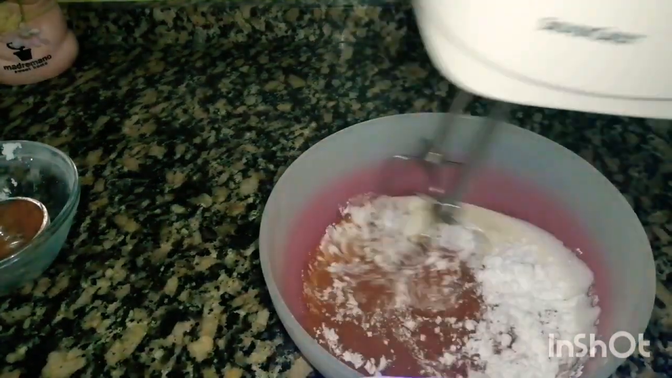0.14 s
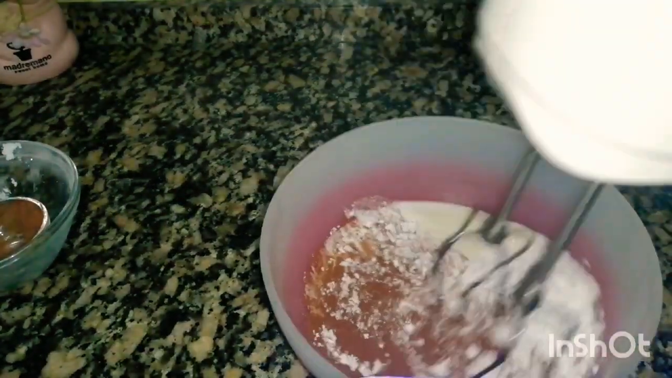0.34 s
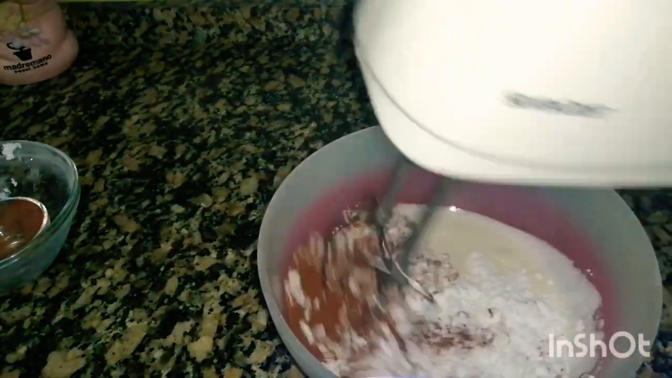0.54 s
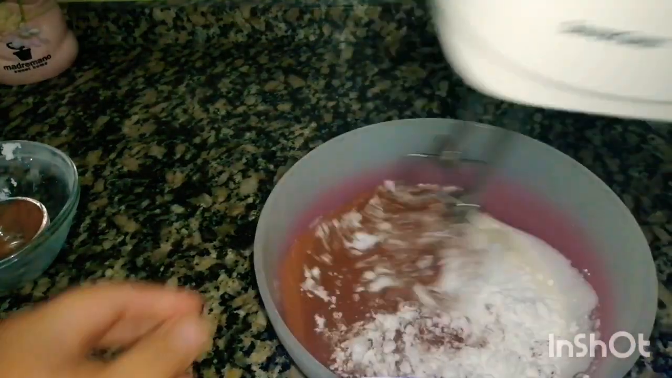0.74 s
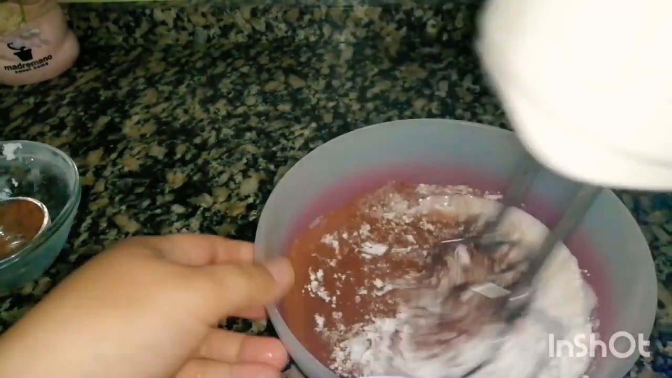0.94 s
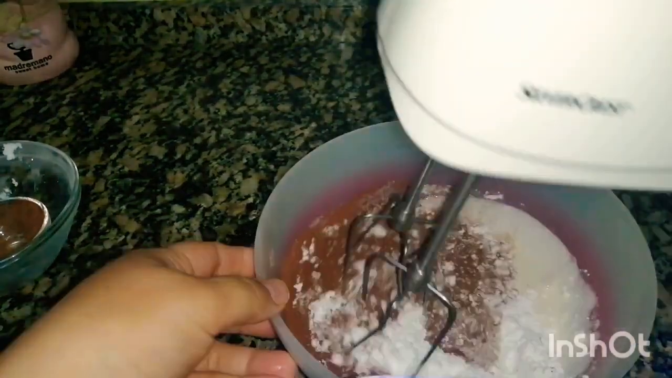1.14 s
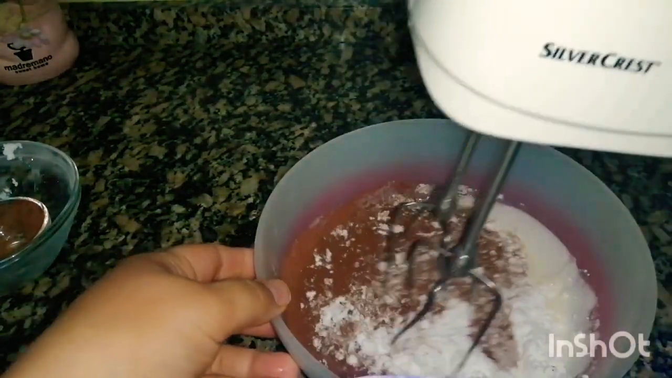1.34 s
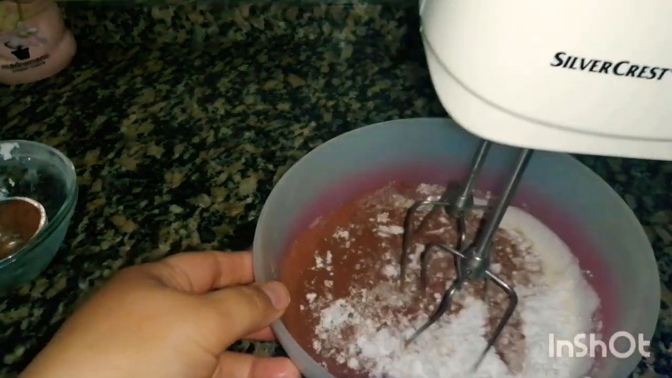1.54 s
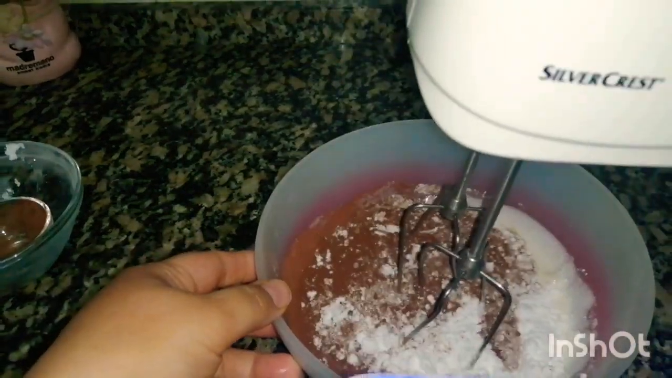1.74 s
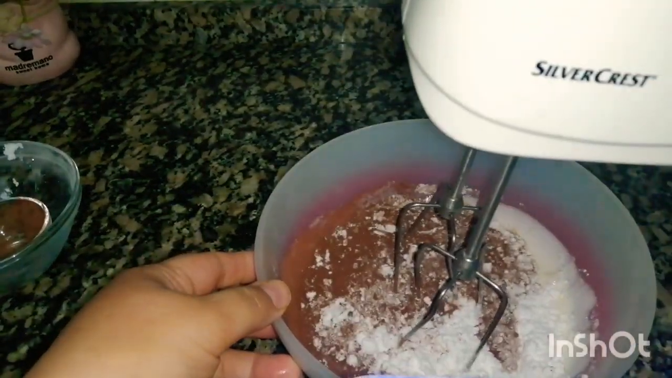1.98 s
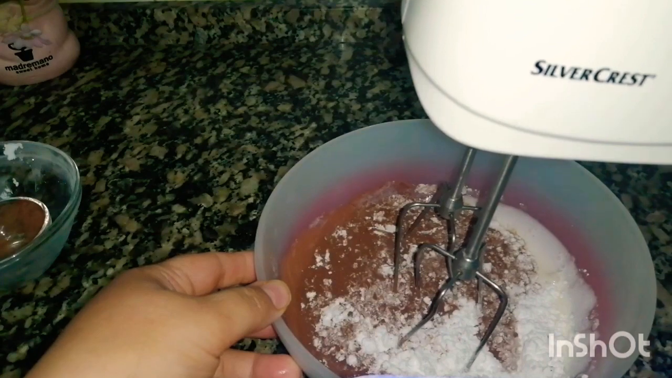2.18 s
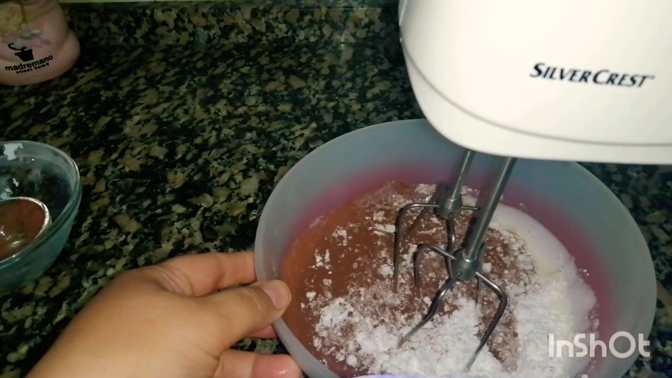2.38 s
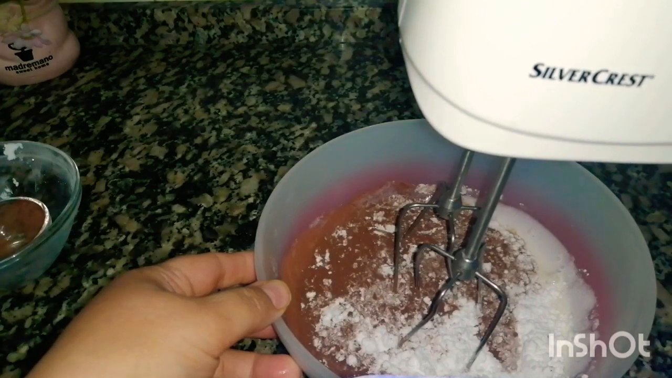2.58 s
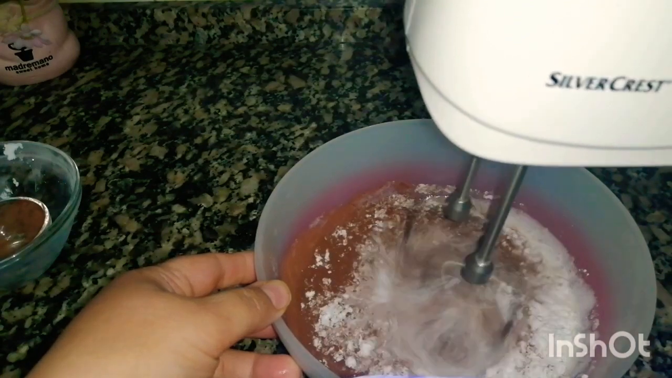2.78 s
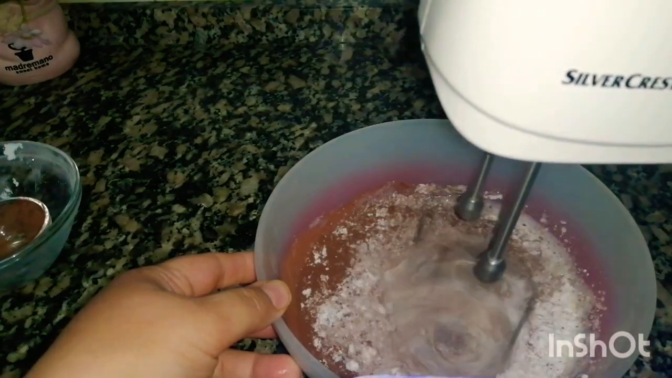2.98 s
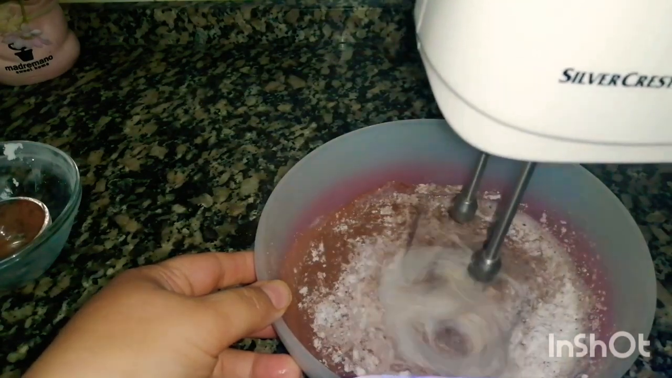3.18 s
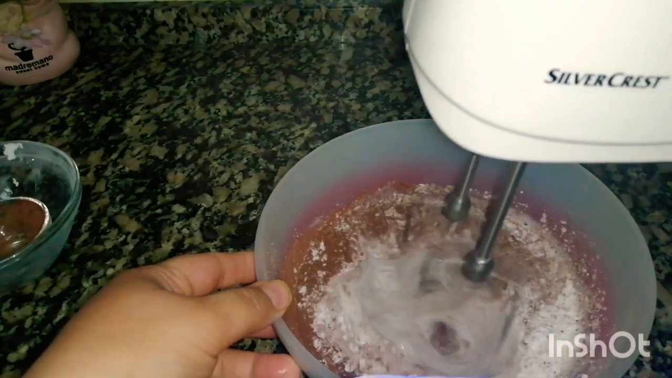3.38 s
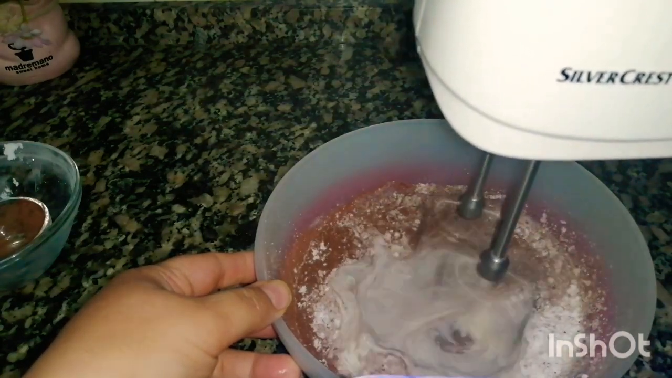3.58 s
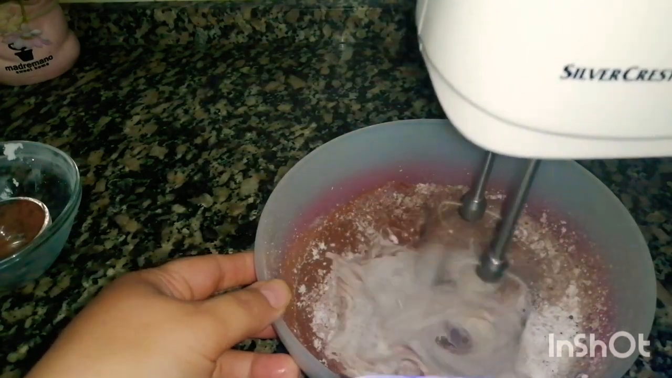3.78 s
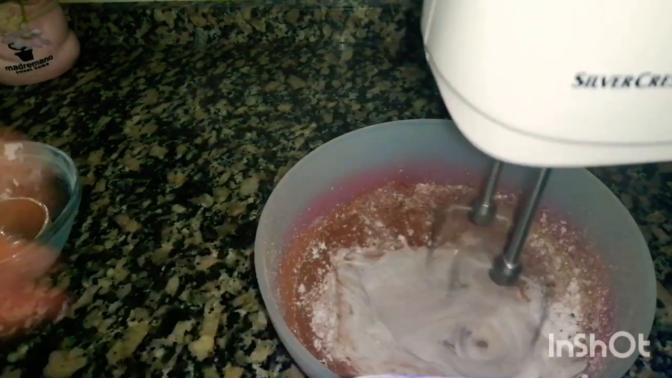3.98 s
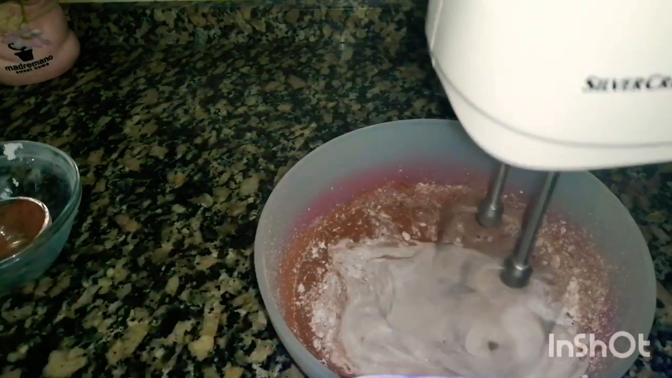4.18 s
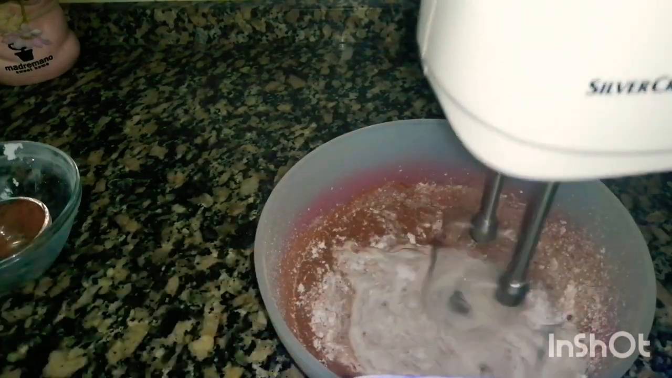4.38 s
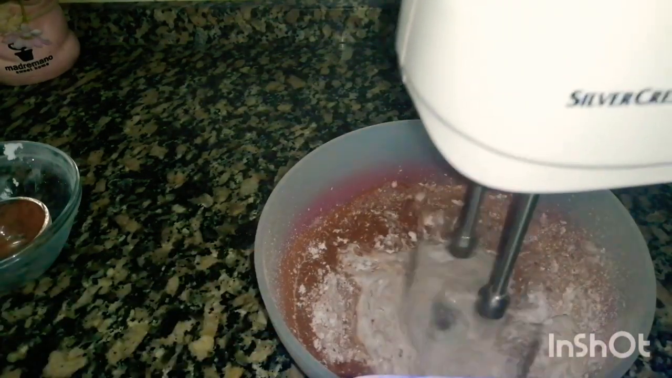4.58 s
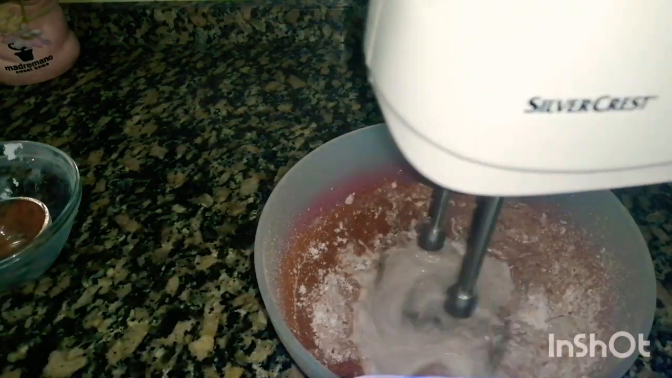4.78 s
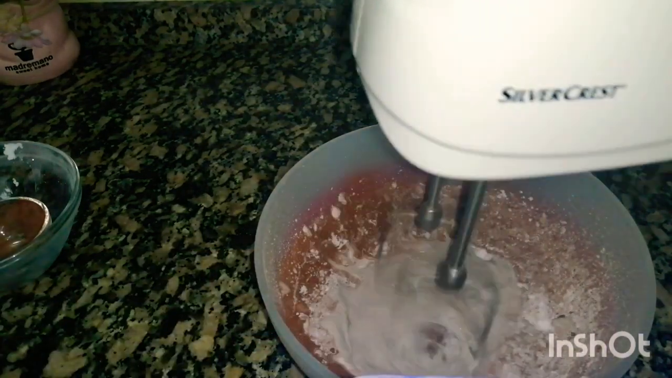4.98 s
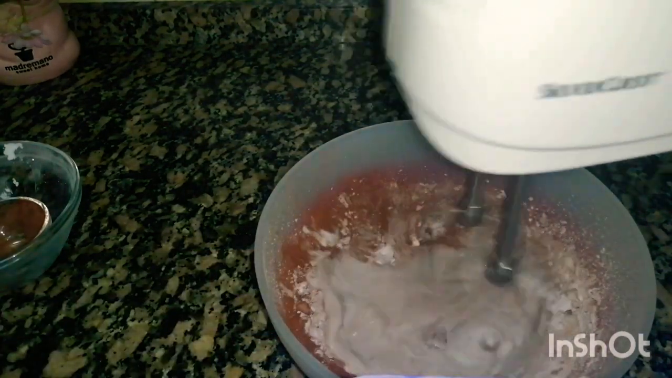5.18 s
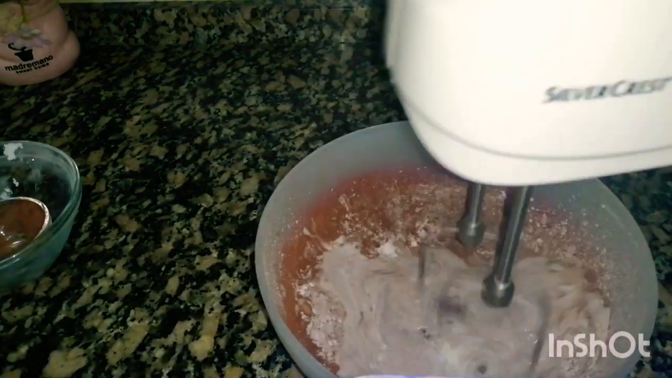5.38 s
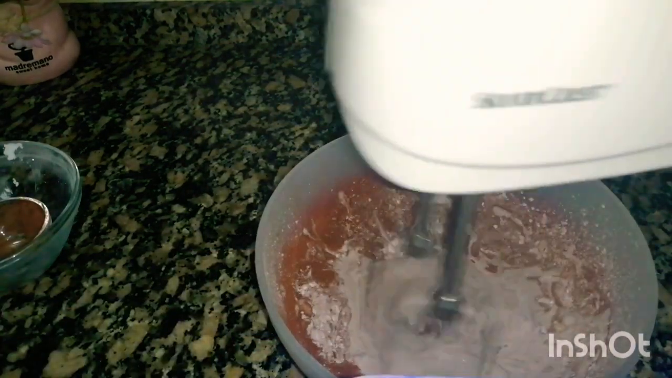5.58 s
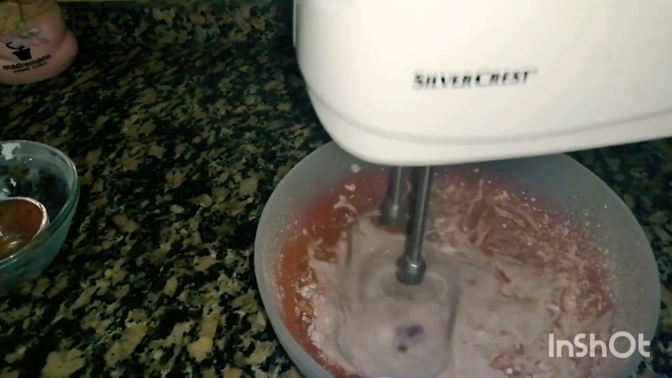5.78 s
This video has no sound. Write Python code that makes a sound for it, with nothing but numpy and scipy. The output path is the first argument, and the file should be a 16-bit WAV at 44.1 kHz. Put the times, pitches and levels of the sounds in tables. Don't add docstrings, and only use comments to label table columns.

```python
import sys
import numpy as np
from scipy import signal
from scipy.fft import rfft, irfft
from scipy.io import wavfile

SR = 44100
rng = np.random.default_rng(int(sys.argv[2]) if len(sys.argv) > 2 else 0)


def unload_wav(signal):
    wavfile.write(
        sys.argv[1],
        SR,
        np.round(np.clip(np.atleast_2d(signal).T, -1, 1) * 32767).astype(np.int16),
    )


def undo_db(level):
    steps = np.asarray(level, float) / 20
    return 10 ** steps


N = 257103
TIME = np.arange(N) / SR
SWITCH_ON_S = 2.7
LOAD_FROM_S, LOAD_FULL_S = 3.7, 4.57
RUSH_TOP_DB = -32
SLOTS = 12

# (time [s], speed [turns/s])
SHAFT_SPEED = [(2.72, 59.6), (2.8, 117.5), (2.88, 165.1), (2.93, 189.8), (3.0, 215.2), (3.08, 237.2),
               (3.17, 255.7), (3.27, 270.7), (3.4, 286.6), (3.55, 298.3), (3.85, 320.5), (4.0, 328.5),
               (4.4, 350.2), (4.6, 358.1), (5.0, 366.3), (5.2, 368.0), (5.4, 366.8), (5.82, 367.5)]
# (frequency [Hz], width [Hz], level [dB])
HOUSING_MODES = [(305, 24, -1), (462, 55, -4), (564, 20, 6)]
# (frequency [Hz], width [Hz], level on top [dB])
MOUNT_MODES = [(274.4, 20, -32.5), (305.2, 12.7, -21.5), (323.9, 4.9, -30), (346.4, 10.6, -39),
               (367.7, 31, -33)]
# (frequency [Hz], width [Hz], level on top [dB])
SHELL_MODES = [(440, 60, -27), (512, 60, -19), (574, 26, -24)]
# (frequency [Hz], width [Hz], level on top [dB])
STATOR_MODES = [(1474, 120, 5.7), (2710, 290, 5.2), (3000, 590, 2.6)]
# (frequency [Hz], width [Hz], level on top [dB])
BRUSH_MODES = [(4700, 250, -4), (5650, 400, 5), (6450, 400, 4)]
# (mains beats off the tone [count], level [dB])
MAINS_SIDE_TONES = [(-1, -5), (0, 0), (1, -7), (2, -8)]
# (multiple of the shaft speed [count], level [dB])
COMMUTATOR_TONES = [(24, -29), (36, -37), (48, -26), (60, -40), (72, -27)]
# (multiple of the shaft speed [count], free level [dB], loaded level [dB], roughness [rad])
GEAR_TONES = [(3, -31, -25, .45), (4, -31, -31, .9), (5, -40, -25, 1.4), (6, -40, -32, 1.2),
              (8, -44, -30, 1.3), (9, -44, -28, .7)]
# (time [s], level [dB])
SWITCH_SPARKS = [
    (2.71, -39.5),
    (2.746, -29),
]
# (time [s], drone level [dB], slop level [dB])
BOWL_GRAZES = [(2.94, -30, -56), (3.08, -24, -58), (3.34, -25.5, -44.5), (3.8, -26, -42.5),
               (3.96, -36, -38), (4.138, -23.5, -50), (4.22, -26, -34.5), (4.34, -25, -42),
               (5.4, -27.5, -35), (5.67, -31.5, -57), (5.8, -34, -36)]
# (time [s], scrape level [dB], drag length [s], bowl rub level [dB], dry crunch level [dB])
WIRE_LANDINGS = [
    (0.198, -49.5, 0.14, -43.5, -71.5),
    (0.46, -57, 0.017, -47, -80),
    (0.64, -50, .18, -75, -60),
    (0.845, -51, 0.022, -56, -66),
    (1.059, -48.5, 0.057, -59, -64),
    (1.262, -47.5, 0.029, -45, -85),
    (1.589, -71, .02, -67, -81),
    (1.98, -78, 0.082, -74, -86),
]
# (time of the top [s], scrape level [dB], bowl rub level [dB], dry crunch level [dB])
WIRE_SWEEPS = [(0.0, -70.5, -57, -100), (0.05, -91, -66, -100), (0.194, -92, -63.5, -105),
               (0.545, -47, -55, -64.5), (0.727, -66, -46.5, -82), (0.911, -59.5, -58.5, -92),
               (1.097, -66, -57, -67), (1.402, -49, -58, -72), (1.5, -60, -60, -76), (2.1, -90, -78, -100),
               (2.7, -75, -64, -81)]
# (frequency [Hz], width [Hz], level [dB])
WIRE_MODES = [(1370, 27, -22), (1910, 26, -0.5), (2300, 33, -1), (2760, 33, 4), (3360, 87, -9),
              (5400, 240, -6.5)]
# (frequency [Hz], level [dB], time to fade by 60 dB [s])
BOWL_MODES = [(181, -2, 0.066), (316.6, -10.5, 0.32), (426, 5, 0.032), (556, -3, 0.049), (890, -3.5, 0.029),
              (1380, -2.5, 0.022), (1970, -29, 0.038), (2720, -6, 0.0098), (3300, -2, 0.021)]
# (time [s], peak level [dB], thud level [dB], crack level [dB])
KNOCK_EVENTS = [(0.198, -32.5, -7, -6.5), (0.211, -40.5, 2.5, 6), (0.22, -44.5, 9, -16),
                (0.255, -27, -17, -19), (0.365, -36.5, -14, -9.5), (0.461, -43, -8, -8),
                (0.472, -34, -2.5, -23), (0.5, -29, -18, -15.5), (0.553, -48, -27, -12),
                (0.64, -57, -25, -17), (0.717, -33.5, -8, -6.5), (0.843, -33, -37, -8),
                (0.853, -23.5, -39, -28), (1.059, -32, -13, -7.5), (1.263, -25.5, -19, -5.5),
                (1.27, -46, -25, -8), (1.393, -45, -39, -12), (1.436, -46, -15, -10),
                (1.548, -44.5, -26, -10), (1.589, -51, -18, -5), (1.612, -39, -36, -23),
                (1.712, -63, 5, -13), (1.8, -63.5, -4, -6), (1.979, -62, -15, -5), (2.709, -57, -20, -4),
                (2.743, -32, -15, 5), (3.43, -27, -13, -15)]
# (time [s], shaking level [dB], slop level [dB])
BOWL_SHOVES = [
    (0.13, -72, -85),
    (0.29, -54, -57),
    (0.51, -45.5, -54),
    (0.73, -55, -47.5),
    (0.91, -52, -58),
    (1.09, -54, -50),
    (1.301, -49, -60),
    (1.62, -72, -57.5),
    (2.06, -79, -58),
    (2.6, -58, -80),
]
# (time [s], shaking level [dB])
COUNTER_BEARING = [(2.75, -87), (2.92, -62), (3.05, -60), (3.33, -46), (3.42, -56), (3.73, -45),
                   (3.87, -36.5), (4.42, -31), (4.6, -35), (4.8, -44.5), (5.05, -59), (5.33, -40),
                   (5.5, -45), (5.65, -41.5), (5.83, -50)]
# (frequency [Hz], gain [dB])
OPEN_PORT_TONE = [(60, -24.5), (110, -17), (200, -31), (300, -6), (1100, -8), (2200, -8), (3100, -5.5),
                  (4000, -15.5), (5300, -6), (6800, -4.5), (7800, -17.5), (11000, -21.5), (14800, -14),
                  (16000, -12)]
# (frequency [Hz], gain [dB])
COVER_TONE = [(40, -33), (110, 4), (210, -9), (500, -1.5), (650, -7.5), (800, 6.5), (1150, 9.5), (1400, -6),
              (2300, -24.5), (3200, -22), (4000, -33.5), (4600, -85), (6000, -104.5), (16000, -53)]
# (frequency [Hz], level per Hz [dB])
HISS_TONE = [(35, -29), (60, -4), (127, 10), (176, -23), (301, 4.5), (1140, -13), (2900, -16.5),
             (4030, -19), (5210, -19), (7750, -23.5), (12700, -25), (14600, -6.5), (16000, -37)]
# (frequency [Hz], difference [dB])
HISS_LEFT_TONE = [(60, -12), (180, -11), (550, -8.5), (1650, 1), (4970, -42), (15000, -92)]


def motor():
    speed, = in_time(SHAFT_SPEED)
    rush_db, drone_db, hum_db = motor_levels(speed)
    since_on = TIME - SWITCH_ON_S
    turn = 2 * np.pi * np.cumsum(speed) / SR

    flutter = undo_db(0.24 * drift(21) + 0.86 * drift(20)) * (1 + 0.052 * np.sin(turn))
    air = undo_db(rush_db + 19.0) * flutter * grains(per_s=15000, spread_db=-0.5)
    rush = air + undo_db(-6.5 + 12.0 * load()) * resonate(air, 3218, 78)
    rush += undo_db(-6) * resonate(air, 5366, 53)
    rush += undo_db(-8 + 10 * load()) * resonate(air, 770, 70)
    rush -= undo_db(-14.5) * resonate(air, 906, 84)

    shake = undo_db(1.5 * drift(9)) * grains(per_s=6000, spread_db=1.5)
    housing = 0
    for hz, width_hz, db in HOUSING_MODES:
        load_tilt_db = -9.5 * load() * np.log2(hz / 430)
        housing = housing + undo_db(db + load_tilt_db) * resonate(shake, hz, width_hz)
    drone = undo_db(drone_db + 26) * housing

    running = np.clip((since_on - .008) / 0.0024, 0, 1)
    spun_up = np.clip((since_on - .04) / 0.051, 0, 1)
    hum_in = np.clip((since_on - .08) / 0.31, 0, 1)
    hum = undo_db(hum_db + 7.0 + 1.8 * drift(30)) * hum_in * np.sin(turn + 0.16 * drift(4.9))
    body = rush + drone + spun_up * shaft_tones(speed, turn)
    return running * (colour(body, OPEN_PORT_TONE) + hum)


def motor_levels(speed):
    rush_db = RUSH_TOP_DB + 11 * np.log2(np.minimum(speed / 265, 1))
    free_db, loaded_db = -31.5, -33
    steady_db = free_db + load() * (loaded_db - free_db) - 0.5 * drift(24)
    steady_db += rush_db - RUSH_TOP_DB
    jolt_db = hump(SWITCH_ON_S + 0.038, -22, 470, 104)
    grazes = [hump(s, db, 211, 211) for s, db, _ in BOWL_GRAZES]
    sparks = [hump(s, db, 8000, 898) for s, db in SWITCH_SPARKS]
    return summed([rush_db] + sparks), summed([steady_db, jolt_db] + grazes), through(MOUNT_MODES, speed)


def shaft_tones(speed, turn):
    slot_db, bar_db = whine_levels(speed)
    tones = 0
    mains_beat_hz = 100
    for beats, db in MAINS_SIDE_TONES:
        off_hz = beats * mains_beat_hz
        level = undo_db(db + shell_level(2 * speed + off_hz) + 3 + 2.2 * drift(12))
        level = level * undo_db(-min(abs(beats), 1) * .6 * np.maximum(speed - 285, 0))
        tones = tones + level * np.sin(2 * turn + 2 * np.pi * off_hz * TIME)
    beat = (1 + .7 * np.sin(2 * np.pi * mains_beat_hz * TIME)) * (1 + .7 * np.sin(turn))
    tones += undo_db(-26 + slot_db + 3.5 * drift(30)) * beat * np.sin(SLOTS * turn + .55 * drift(30))
    for multiple, db in COMMUTATOR_TONES:
        heard = multiple * speed < .45 * SR
        level = heard * undo_db(db + bar_db + 3.5 * drift(15))
        tones += level * np.sin(multiple * turn + .9 * drift(25))
    for multiple, free_db, loaded_db, rough in GEAR_TONES:
        level = undo_db(free_db + load() * (loaded_db - free_db) + 2 * drift(20))
        tones += level * np.sin(multiple * turn + rough * drift(35))
    return tones


def whine_levels(speed):
    above = np.maximum(SLOTS * speed / 3250 - 1, 0)
    slot_db = summed([through(STATOR_MODES, SLOTS * speed) - 120 * above, -24])
    bar_db = summed([through(BRUSH_MODES, 2 * SLOTS * speed) - 90 * above, -2])
    return slot_db, bar_db + 24 * np.log2(np.minimum(speed / 185, 1))


def shell_level(hz):
    octaves_out = np.abs(np.log2(np.maximum(hz, 20) / np.clip(hz, 430, 580)))
    return summed([through(SHELL_MODES, hz) - 130 * octaves_out, -41])


def load():
    return np.clip((TIME - LOAD_FROM_S) / (LOAD_FULL_S - LOAD_FROM_S), 0, 1)


def stirring():
    scrape_db, rub_db, crunch_db = stroke_levels()
    by_hand = TIME < SWITCH_ON_S
    effort = undo_db(scrape_db + 15.0) * by_hand
    grit = undo_db(1.8 * drift(21)) * grains(per_s=9000, spread_db=0.0)
    scrape = passing(effort * grit, 6350, "low", order=4)
    crunch = passing(undo_db(crunch_db + 29.0) * by_hand * grit, 7300, "high", order=4)
    rattle = 0
    for hz, width_hz, db in WIRE_MODES:
        hits = effort * grains(per_s=330, spread_db=2.0)
        rattle = rattle + undo_db(db + 4 * drift(12)) * resonate(hits, hz, width_hz)
    rub = undo_db(rub_db + 2.0 * drift(50)) * by_hand * grains(per_s=2800, spread_db=-4.0)
    wall = sum(undo_db(db) * ring(rub, hz, 0.41 * t60) for hz, db, t60 in BOWL_MODES)
    wires = colour(scrape + crunch + undo_db(6.0) * rattle, OPEN_PORT_TONE)
    return wires + undo_db(-19.0) * passing(wall, 240, "high", order=2)


def stroke_levels():
    scrape, rub, crunch = [], [], []
    lift = 222
    for s, scrape_db, drag_s, rub_db, crunch_db in WIRE_LANDINGS:
        t = TIME - s
        landed = 4 * np.exp(-np.abs(t) / 0.0094) - 27 * t
        down = np.where(t < 0, 6000 * t, landed)
        lifted = np.maximum(t - drag_s, 0)
        scrape.append(scrape_db + down - lift * lifted)
        rub.append(rub_db + down - 158 * np.maximum(t - 0.57 * drag_s, 0))
        crunch.append(crunch_db + down - 3.3 * lift * lifted)
    for s, *levels_db in WIRE_SWEEPS:
        for layer, db in zip([scrape, rub, crunch], levels_db):
            layer.append(hump(s, db, 318, 196))
    return summed(scrape), summed(rub), summed(crunch)


def knocks():
    s, peak_db, thud_db, crack_db = np.transpose(KNOCK_EVENTS)
    at = np.round(s * SR).astype(int)
    luck = rng.standard_normal((len(s), len(BOWL_MODES)))
    bowl = np.zeros(N)
    for k, (hz, db, t60) in enumerate(BOWL_MODES):
        clicks = np.zeros(N)
        low_or_high_db = thud_db if hz < 1000 else -11
        clicks[at] = undo_db(peak_db + low_or_high_db + db + 1 + 4 * luck[:, k])
        bowl += ring(clicks, hz, t60)
    blows = np.zeros(N)
    blows[at] = undo_db(peak_db + crack_db + 17.5)
    fading = signal.lfilter([1], [1, -np.exp(-1 / (0.0054 * SR))], blows)
    crack = passing(fading * rng.standard_normal(N), 9200, "low", order=2)
    return passing(bowl, 207, "high", order=2) + colour(crack, OPEN_PORT_TONE)


def rumble():
    shaking_db, slop_db = rumble_levels()
    noise = rng.standard_normal((3, N))
    shaking = passing(noise[:2], [24, 35], "band", order=2)
    shaking = rms_one(passing(shaking, 48, "low", order=2))
    slop = rms_one(passing(noise[2], [85, 200], "band", order=2))
    shaking_sides = undo_db(np.array([[0], [-28]]))
    slop_sides = undo_db(np.array([[-3], [1.5]]))
    return undo_db(shaking_db + 3.5) * shaking * shaking_sides + undo_db(slop_db - 5.5) * slop * slop_sides


def rumble_levels():
    bearing_db, = in_time(COUNTER_BEARING)
    smooth_db = -12 * (load() == 1)
    whipped_db = -49.5 + 0.18 * (bearing_db + 44) + smooth_db
    whipped_db = np.where(TIME > COUNTER_BEARING[0][0], whipped_db, -75.5)
    shaking, slop = [-69, bearing_db], [whipped_db]
    for s, shake_db, slop_db in BOWL_SHOVES:
        shove = hump(s, 0, 230, 230)
        shaking.append(shake_db + shove)
        slop.append(slop_db + shove)
    slop += [hump(s, db, 211, 211) for s, _, db in BOWL_GRAZES]
    return summed(shaking), summed(slop)


def kitchen(x):
    t = np.arange(SR // 2) / SR
    t60_s = 0.17
    tail = rng.standard_normal(len(t)) * undo_db(-60 * t / t60_s) * (t > .004)
    return signal.fftconvolve(x, tail / np.sqrt(np.sum(tail ** 2)))[:N]


def covered_port(near):
    echoes = colour(kitchen(near), [(300, -12), (1200, -9), (2500, 0)])
    direct = colour(near, [(300, -8.5), (1500, -13.0), (3000, -14.5)])
    muffled = passing(colour(direct + echoes, COVER_TONE), 5200, "low", order=4)
    return np.interp(TIME - .00011, TIME, muffled)


def open_port(near):
    return near + undo_db(-14) * kitchen(near)


def hiss():
    right = colour(rng.standard_normal(N), HISS_TONE)
    left = colour(rng.standard_normal(N), HISS_TONE, HISS_LEFT_TONE)
    return undo_db(-72.5 + 3.5) * np.array([left, right]) / np.std(right)


def rms_one(x):
    return x / np.sqrt(np.mean(x ** 2) + 1e-20)


def in_time(rows):
    s, *columns = np.transpose(rows)
    return [np.interp(TIME, s, column) for column in columns]


def colour(x, *spectra):
    size = 2 ** 14
    log_hz = np.log(np.maximum(np.fft.rfftfreq(size, 1 / SR), 1))
    db = 0
    for spectrum in spectra:
        hz, gain_db = np.transpose(spectrum)
        db = db + np.interp(log_hz, np.log(hz), gain_db)
    cepstrum = irfft(np.log(undo_db(db)))
    cepstrum[1:size // 2] *= 2
    cepstrum[size // 2 + 1:] = 0
    return signal.fftconvolve(x, irfft(np.exp(rfft(cepstrum))))[:N]


def drift(rate):
    r = np.exp(-80 * np.pi * rate / SR)
    noise = rng.standard_normal(N // 40 + 2002)
    slow = signal.lfilter([1], [1, -2 * r, r * r], noise)[2000:]
    return np.interp(np.arange(N) / 40, np.arange(len(slow)), rms_one(slow))


def resonate(x, hz, width_hz):
    r = np.exp(-np.pi * width_hz / SR)
    feedback = [1, -2 * r * np.cos(2 * np.pi * hz / SR), r * r]
    return signal.lfilter(np.array([1, 0, -1]) * (1 - r * r) / 2, feedback, x)


def ring(clicks, hz, t60):
    r, w = undo_db(-60 / (t60 * SR)), 2 * np.pi * hz / SR
    return signal.lfilter([0, np.sin(w)], [1, -2 * r * np.cos(w), r * r], clicks + 1e-18)


def grains(per_s, spread_db):
    sizes = undo_db(spread_db * np.minimum(rng.exponential(1, N), 5)) * rng.standard_normal(N)
    return rms_one(sizes * (rng.random(N) < per_s / SR))


def passing(x, hz, kind, order):
    return signal.sosfilt(signal.butter(order, hz, kind, fs=SR, output="sos"), x)


def summed(levels_db):
    power = sum(np.exp(np.log(10) / 10 * db) for db in levels_db)
    return 10 * np.log10(power + 1e-30)


def hump(s, db, rise_db_per_s, fall_db_per_s):
    return db - np.where(TIME < s, rise_db_per_s * (s - TIME), fall_db_per_s * (TIME - s))


def through(modes, hz):
    grid = np.linspace(np.min(hz), np.max(hz), 2048)
    gain = np.abs(sum(undo_db(db) / (1 + 2j * (grid - top) / width) for top, width, db in modes))
    return np.interp(hz, grid, 20 * np.log10(gain))


def scene():
    near = motor() + stirring() + knocks()
    return np.array([covered_port(near), open_port(near)]) + hiss() + rumble()


def band_limit(x):
    return signal.sosfilt(signal.butter(12, 16680, fs=SR, output="sos"), x)


def record(dry):
    top_cut = signal.ellip(14, .5, 80, 15850, fs=SR, output="sos")
    mix = signal.sosfilt(top_cut, dry)
    return band_limit(mix)


dry = scene()
out = record(dry)
unload_wav(out)
```